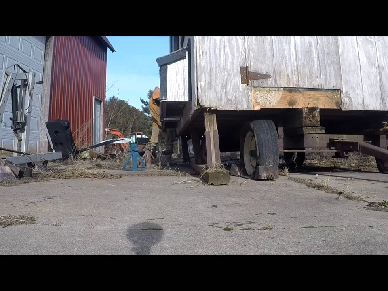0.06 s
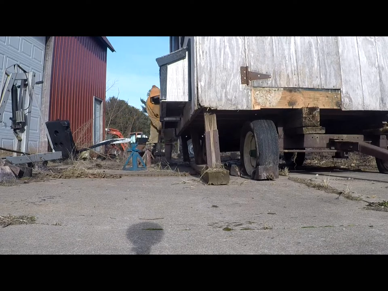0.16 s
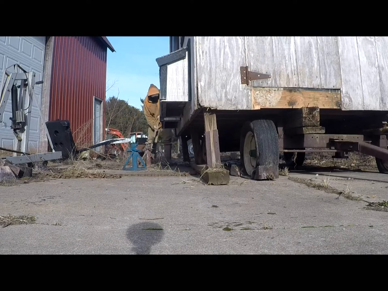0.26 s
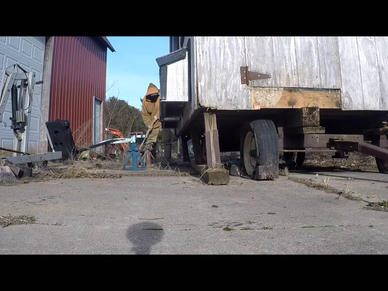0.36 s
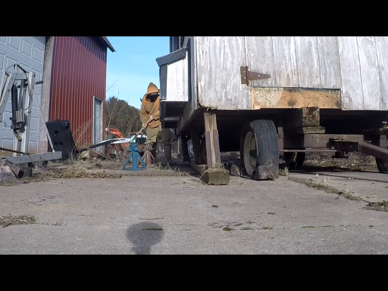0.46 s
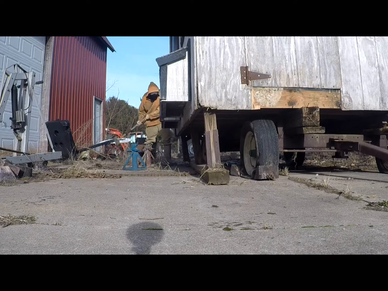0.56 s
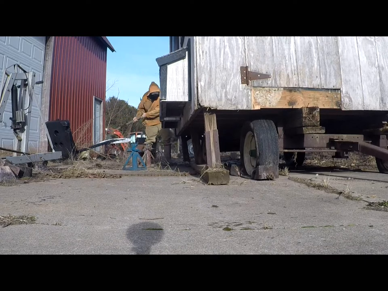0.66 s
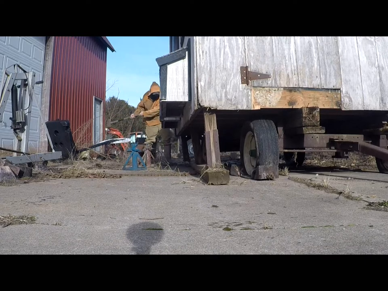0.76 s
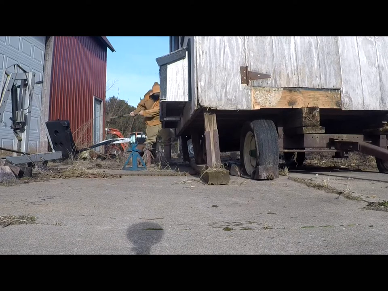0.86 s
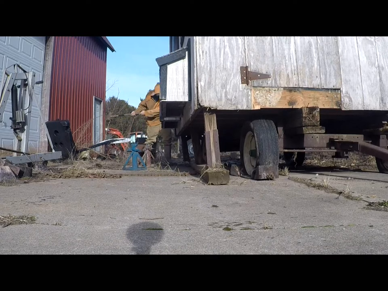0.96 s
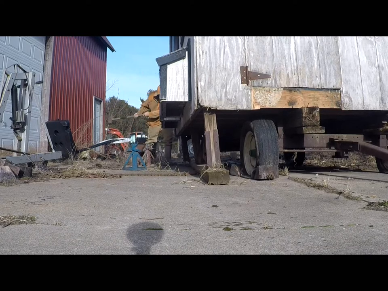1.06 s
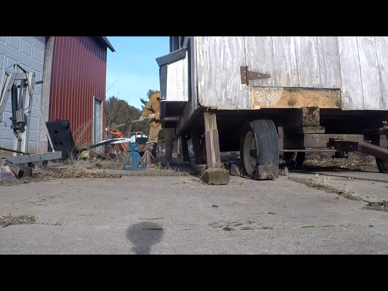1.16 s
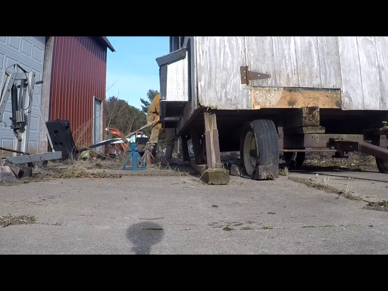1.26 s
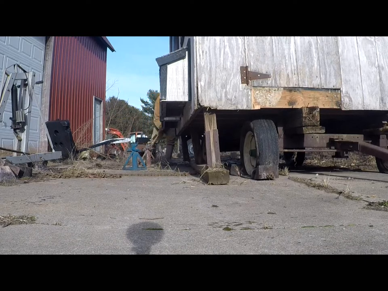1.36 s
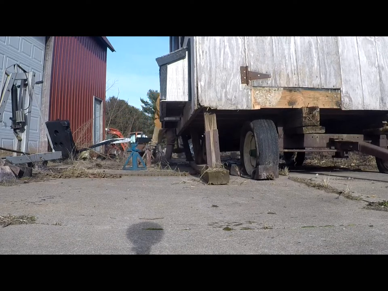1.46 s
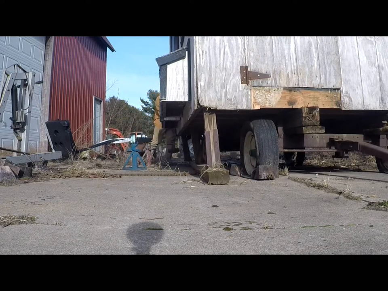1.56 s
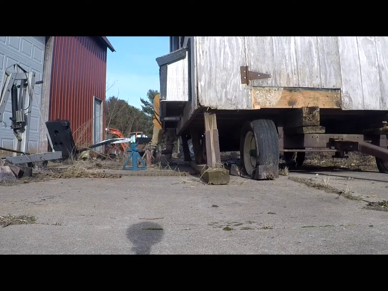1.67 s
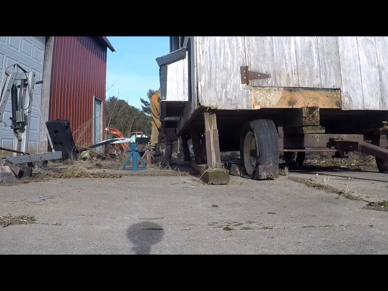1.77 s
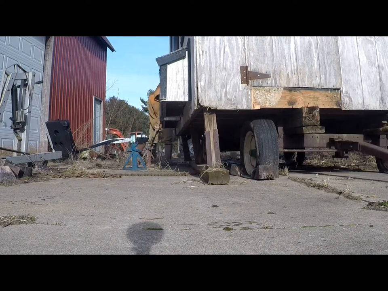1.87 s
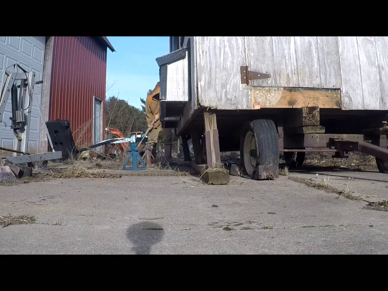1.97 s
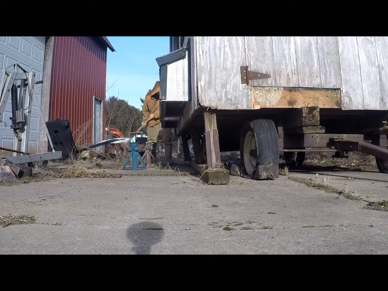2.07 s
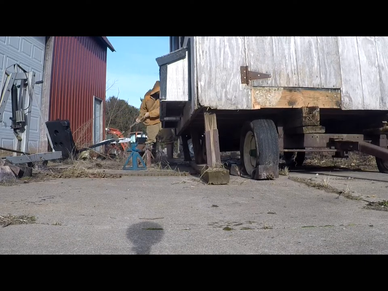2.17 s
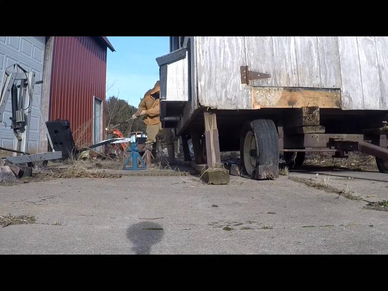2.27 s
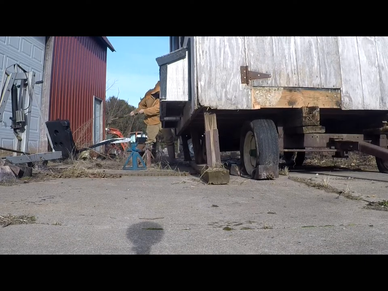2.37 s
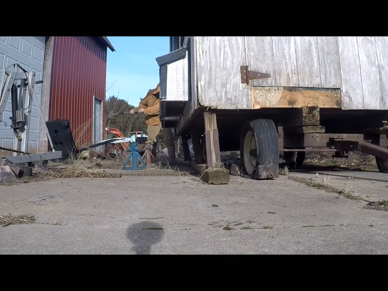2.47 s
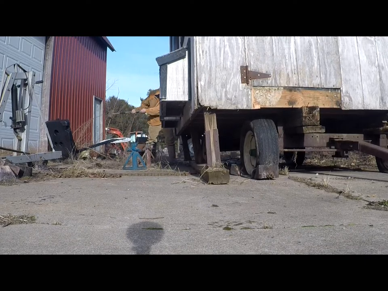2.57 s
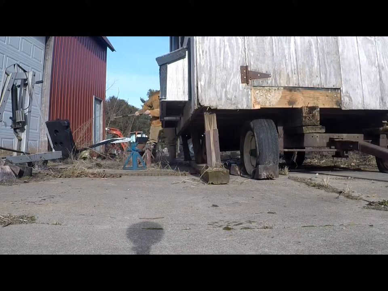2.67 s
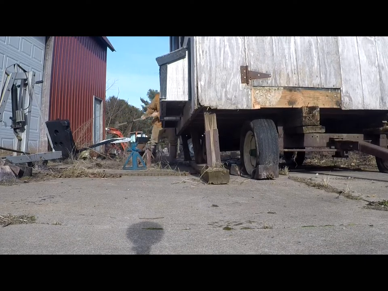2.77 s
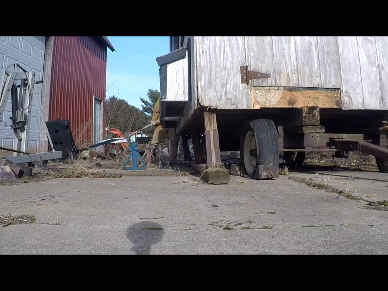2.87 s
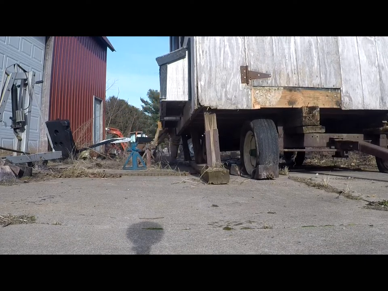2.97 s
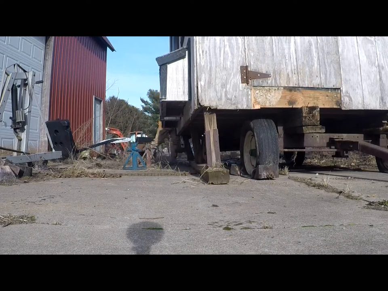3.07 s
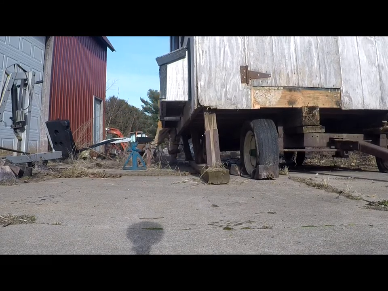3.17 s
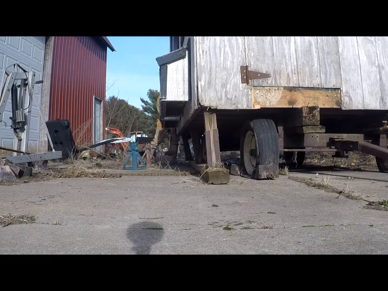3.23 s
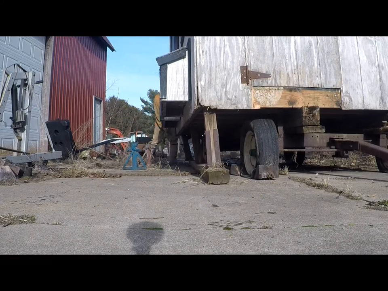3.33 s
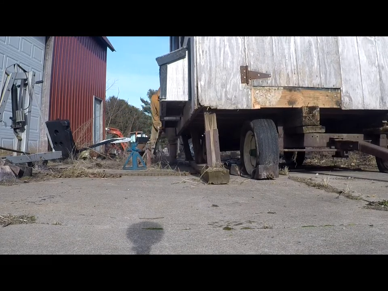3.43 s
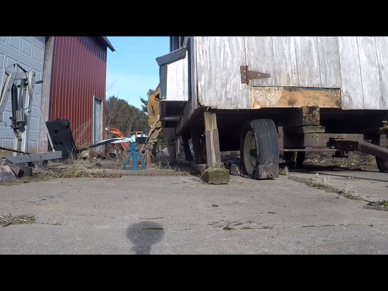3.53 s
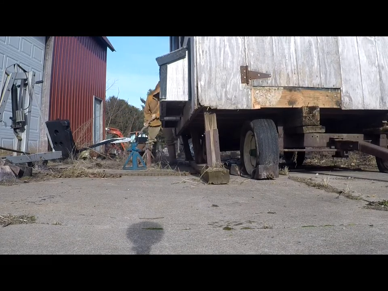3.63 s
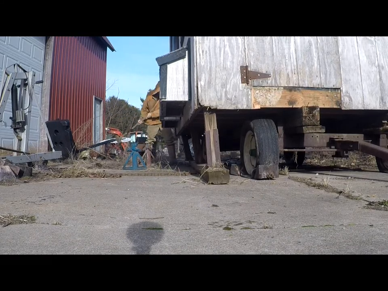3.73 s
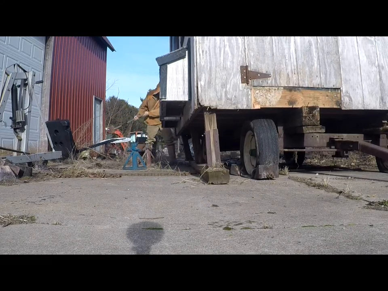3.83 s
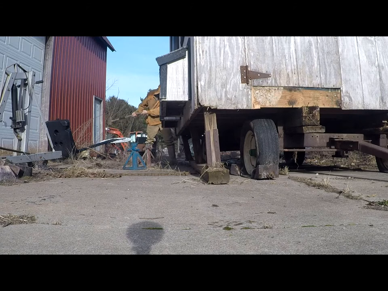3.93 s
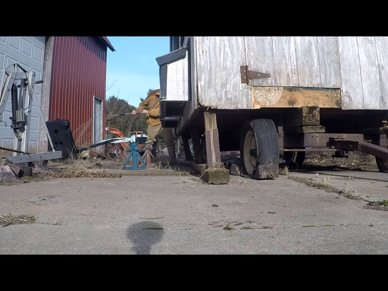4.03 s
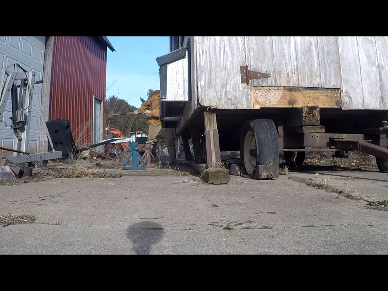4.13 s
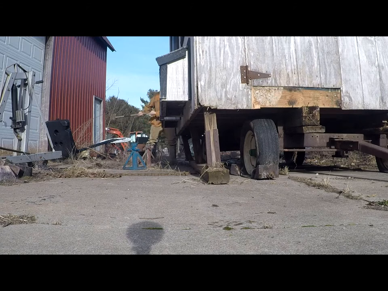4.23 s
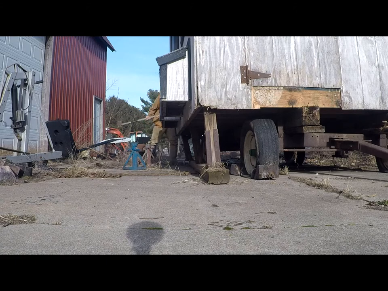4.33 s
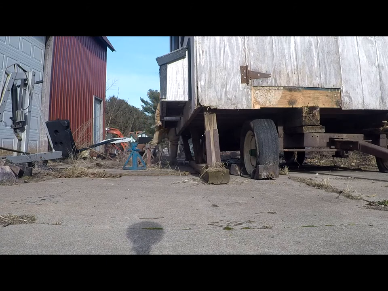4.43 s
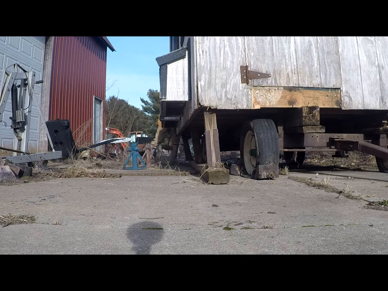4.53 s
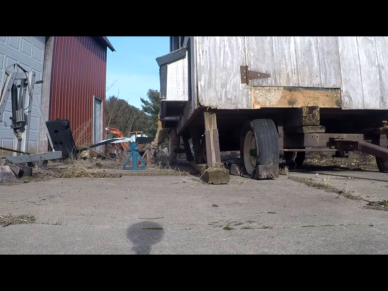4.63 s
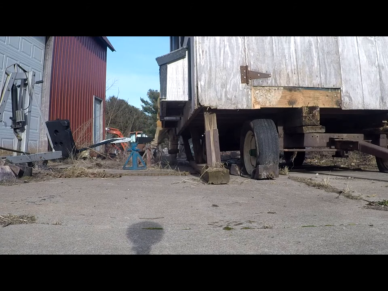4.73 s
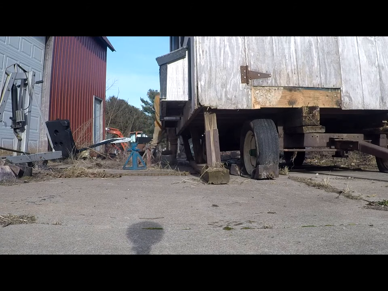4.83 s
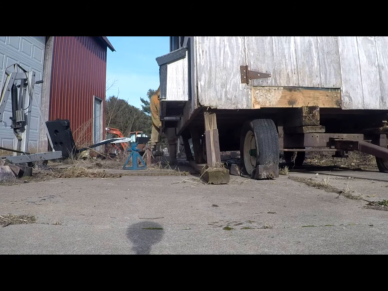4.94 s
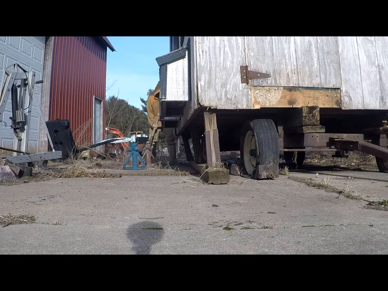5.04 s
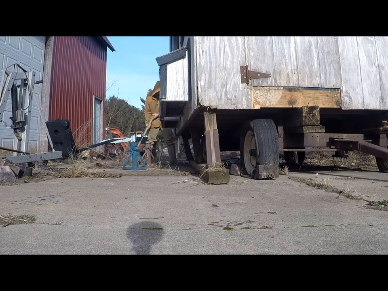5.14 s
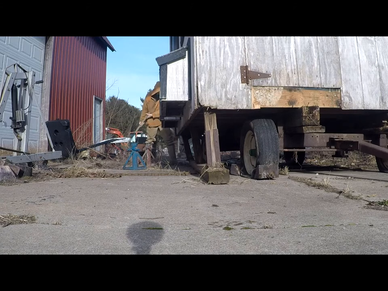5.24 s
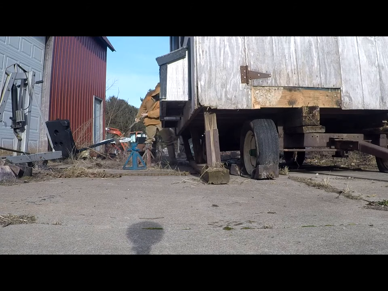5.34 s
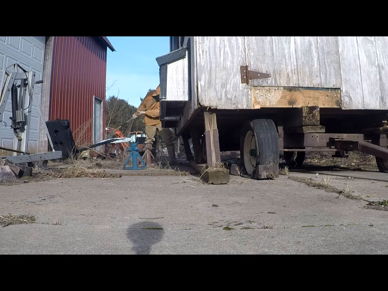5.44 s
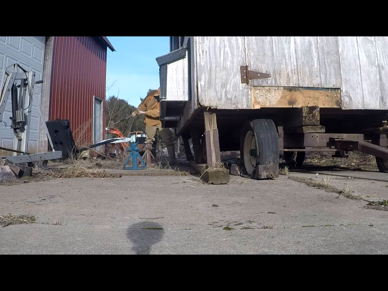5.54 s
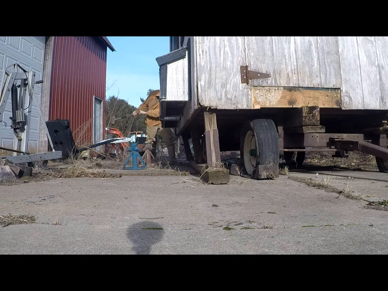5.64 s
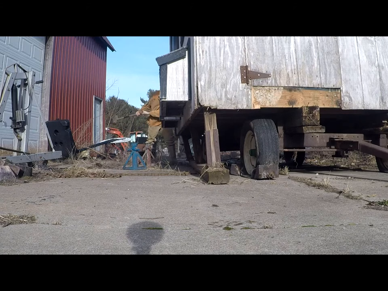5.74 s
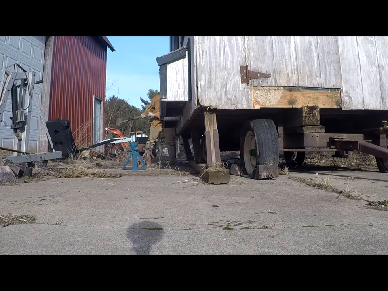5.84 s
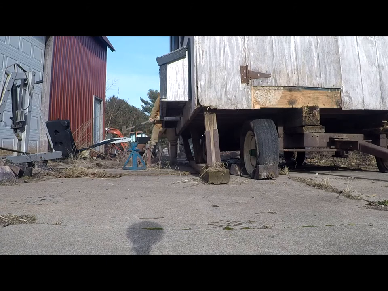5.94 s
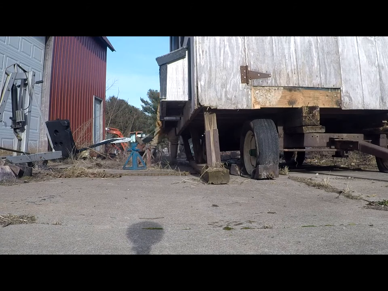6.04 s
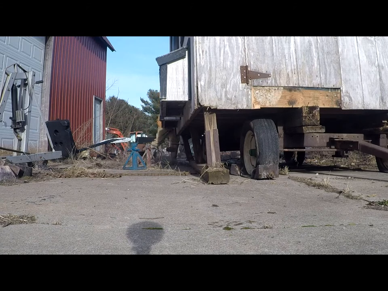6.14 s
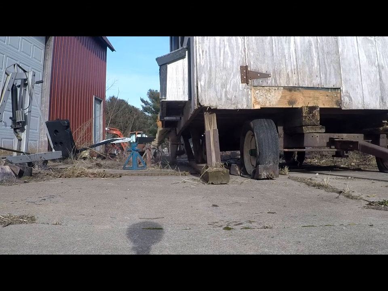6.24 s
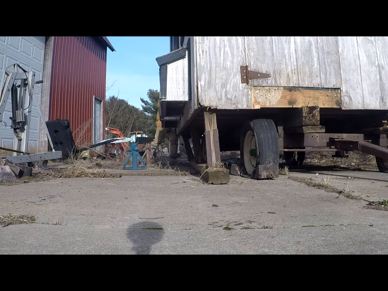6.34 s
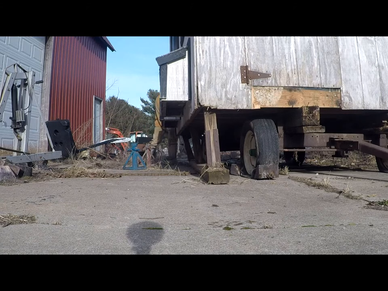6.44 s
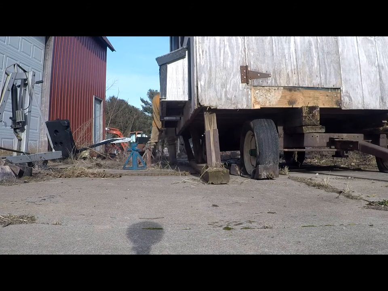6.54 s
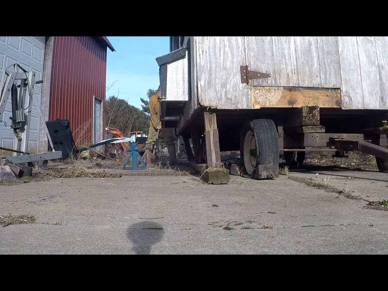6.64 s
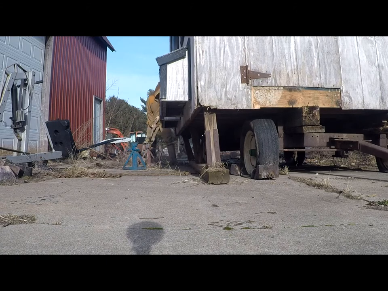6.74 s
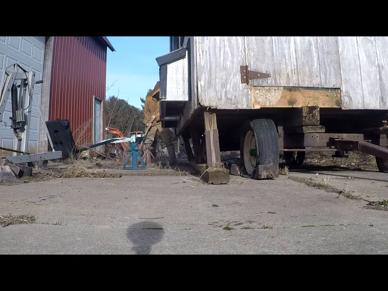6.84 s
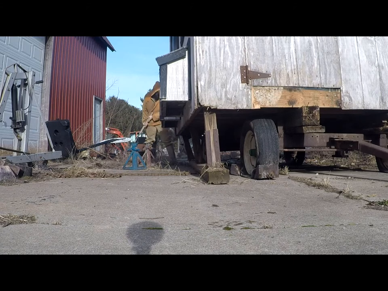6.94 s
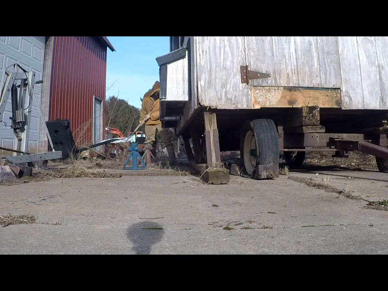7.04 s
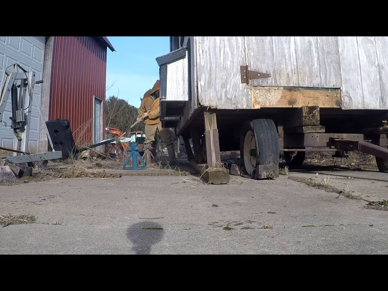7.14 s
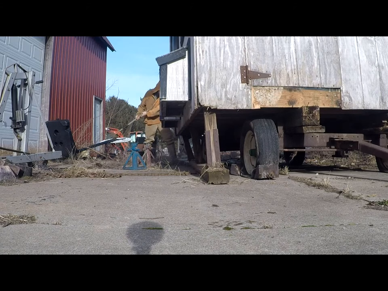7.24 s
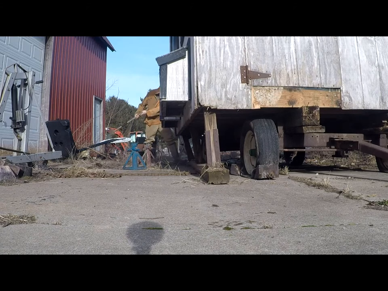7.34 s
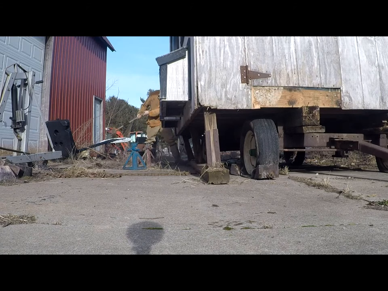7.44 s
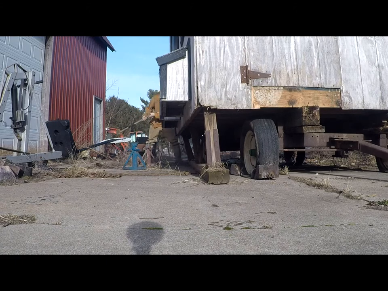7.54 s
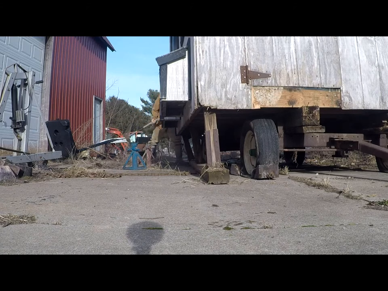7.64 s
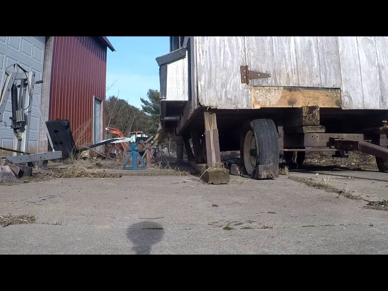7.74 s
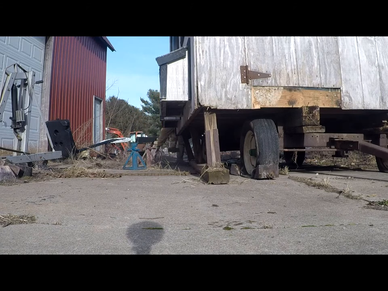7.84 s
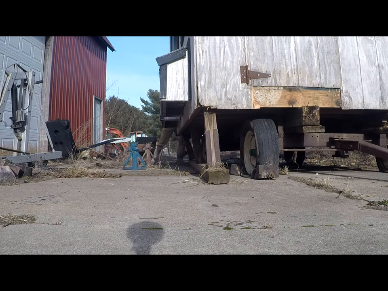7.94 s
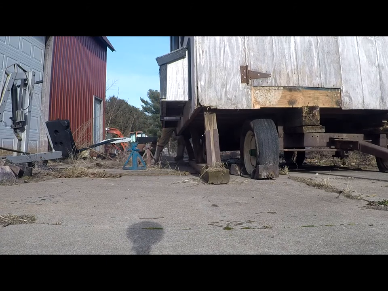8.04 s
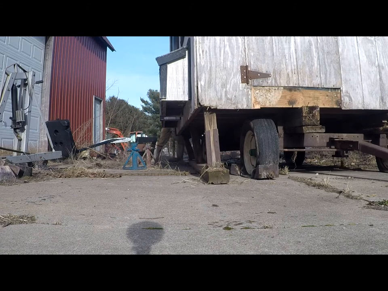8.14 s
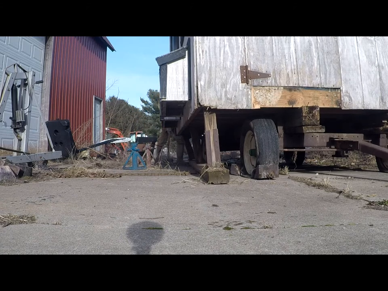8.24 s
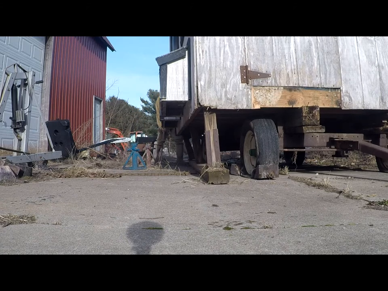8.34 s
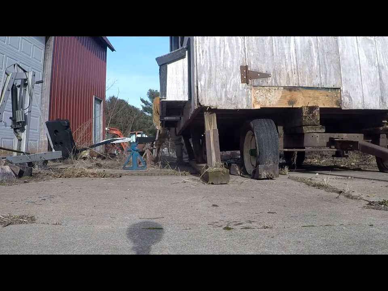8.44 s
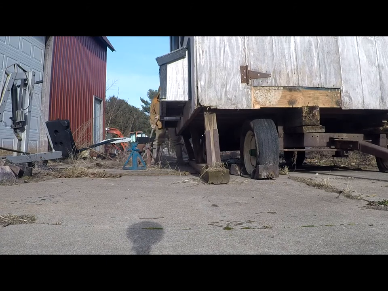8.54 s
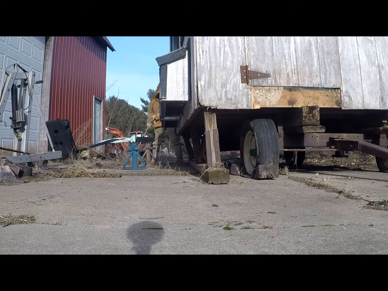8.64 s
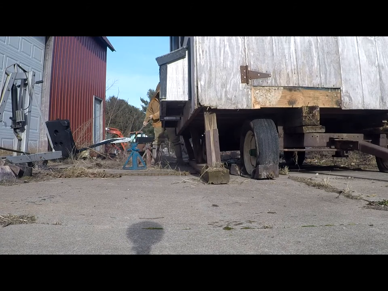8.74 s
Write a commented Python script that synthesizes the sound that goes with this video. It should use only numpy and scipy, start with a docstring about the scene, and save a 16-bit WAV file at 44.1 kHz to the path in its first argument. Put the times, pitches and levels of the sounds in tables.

```python
"""A long-handled steel jack lifts a wooden building in a concrete yard, one stroke about every 1.6 s.
Each stroke ends as the load drops onto the pin: noise bursts for the steel, decaying modes for the timber
frame, and an overloaded microphone. Between strokes the handle scuffs and ticks, and the pivot creaks.
A far vehicle passes and recedes as shaped noise and engine tones, over dry leaves, rumble and wind;
rush and leaves swell back after every clank as the gain control recovers."""
import sys
import numpy as np
from scipy import signal
from scipy.fft import rfft, irfft
from scipy.io import wavfile
from scipy.ndimage import uniform_filter1d, minimum_filter1d

SR = 44100
rng = np.random.default_rng(int(sys.argv[2]) if len(sys.argv) > 2 else 0)


def put_to_file(sound):
    """Save the sound as 16-bit audio at rate SR, in the file named by the first command-line argument."""
    columns = np.atleast_2d(sound).T  # one column per channel
    safe = np.clip(columns, -1, 1)
    whole_steps = np.round(safe * 32767)
    wavfile.write(sys.argv[1], SR, whole_steps.astype(np.int16))


N = 388080
TIME = np.arange(N) / SR   # seconds

# The load drops on the pin. Each row: time of landing in seconds, level in dB, crack in dB, rebound in dB
# relative to the crack, strongest boom in Hz, steel ring in dB.
CLANKS = [(-.035, -3, -1, 2, 198, -14), (1.5451, 0.5, 0, -15, 344, -2), (3.127, 0, 1.5, -10.5, 223.3, 1),
          (4.6519, 0.5, 0.5, -16, 268, -3), (6.2443, -0.5, 0, -20, 283, 2.5),
          (7.945, 0.5, -1, -9.5, 265, 1)]
# Modes of jack and timber frame. Each row: frequency in Hz, relative level in dB, t60 in seconds.
FRAME_MODES = [(64.5, -21, 0.33), (90.4, -24, 0.4), (139.6, -18.5, 0.35), (187, -16.5, 0.051),
               (218.8, -12, 0.28), (269.2, -10.5, 0.16), (289.3, -7.5, .21), (343.8, -14.5, .23),
               (466, -14.5, 0.21), (581, -16.5, 0.22), (688.5, -18, 0.16), (844, -22, 0.13),
               (958, -24, 0.26), (1020, -14, 0.16), (1130, -20, 0.19), (1235, -22, 0.2), (1505, -21, 0.08),
               (1505, -28, 0.15), (2094, -22.5, 0.17), (2250, -24, 0.074), (2866, -20, 0.078),
               (4007, -26, 0.12), (4850, -28, 0.14), (5250, -27.5, 0.12), (7500, -60, 1.3),
               (12000, -70.5, 0.88)]
# Colour of a sharp steel snap. Each row: frequency in Hz, relative level per Hz in dB.
SNAP_COLOUR = [(800, -6.5), (2500, -4.5), (5500, -4), (8500, 5.5), (10500, -11.5), (15000, -16)]
# Colour of the heavy steel contact. Each row: frequency in Hz, relative level per Hz in dB.
CRACK_COLOUR = [(100, -5.5), (300, -2), (700, 1.5), (1150, 1.5), (2000, -7), (4000, -12.5), (8500, -16.5),
                (10500, -25), (15000, -31)]
# Colour of the rattling planks. Each row: frequency in Hz, relative level per Hz in dB.
PLANKS_COLOUR = [(30, -6), (100, -8), (260, 1.5), (420, -10.5), (1000, -20), (2000, -23), (4000, -30.5),
                 (8000, -38), (11000, -50.5), (15000, -46.5)]
# Colour of the far echo of the yard. Each row: frequency in Hz, relative level per Hz in dB.
YARD_COLOUR = [(30, -7), (200, -5), (400, -4.5), (1000, -10.5), (3000, -30.5), (8000, -44), (15000, -50.5)]
# Loose steel parts ring after a drop. Each row: start in seconds, frequency in Hz, level in dB,
# t60 in seconds, chatter in dB.
PINGS = [(4.740, 4608, -11, .17, -18), (4.740, 8775, -15, .13, -17), (4.740, 12150, -18, .13, -21),
         (4.808, 2330, -31, .25, -28), (4.862, 2740, -33, .65, -27), (4.862, 4161, -30, .2, -34),
         (4.862, 5405, -24, .13, -34)]
# The clearest ticks of the handle and its pins. Each row: start in seconds, ring in dB, ring in Hz, snap in dB.
TICKS = [(0.721, -36, 3040, -34), (1.3535, -35, 2980, -22), (2.077, -39, 1600, -30),
         (2.218, -34, 3800, -27.5), (2.320, -32.5, 3000, -27), (4.1750, -33.5, 2590, -38),
         (4.4765, -33, 1800, -53), (4.807, -20, 2340, -16), (5.475, -38, 3050, -35),
         (6.703, -30, 1840, -42), (6.7455, -29, 1490, -41), (6.793, -31, 3110, -31),
         (6.9197, -33, 2280, -41), (8.2823, -38, 3560, -24), (8.426, -44, 3500, -27),
         (8.493, -39, 1760, -29.5), (8.587, -31.5, 3070, -38), (8.777, -36, 1940, -46)]
# The handle is swung back in a short run of scuffs. Each row: start in seconds, level in dB,
# time between scuffs in seconds, change from one scuff to the next in dB.
SWINGS = [(2.085, -26.5, .1, 0), (3.665, -26, 0.1, -1), (4.911, -18, 0.132, -6), (5.265, -23, 0.15, -4),
          (6.745, -20.5, 0.089, -3), (7.0, -27, 0.11, -6), (8.488, -23.5, .11, -1)]
# Colour of a scuff. Each row: frequency in Hz, relative level per Hz in dB.
SCUFF_COLOUR = [(100, -14), (200, -2), (330, -2), (430, 2), (520, -2), (680, -3), (950, -9), (2000, -20),
                (5000, -31), (15000, -45)]
# Steel creaks as the load peaks. Each row: middle in seconds, width in seconds, level in dB.
RUBS = [(2.99, 0.014, -35.5), (4.52, .031, -47), (5.8, 0.037, -45.5), (7.5, 0.013, -44), (7.77, 0.082, -43)]
# What the creaking sets ringing. Each row: frequency in Hz, relative level in dB, t60 in seconds.
PIVOT_MODES = [(1710, -1.5, 0.0066), (2000, -8, .015), (2820, -5.5, .012), (3180, -10, 0.027),
               (3454, -9.5, 0.012), (4400, -18, 0.0035), (8140, -15, .01)]
# The pivot squeaks. Each row: start in seconds, length in seconds, start in Hz, end in Hz, level in dB.
SQUEAKS = [(4.053, 0.13, 5020, 5030, -47), (4.2, 0.047, 4540, 4200, -43)]
# Colour of the far tyre rush. Each row: frequency in Hz, relative level per Hz in dB.
RUSH_COLOUR = [(88, -26), (150, -0.5), (178, -4.5), (289, -9.5), (378, -7), (601, -9), (701, -9.5),
               (1430, -12.5), (4120, -26.5), (15000, -48.5)]
# The far engine's orders swell in turn. Each row: multiple of the firing rate, loudest moment in seconds,
# width in seconds, level in dB.
ENGINE_ORDERS = [(1, 1.5, 0.51, -33), (2, 0.71, .7, -37.5), (3, 0.25, 0.2, -45), (4, 0.31, 0.39, -31)]
# Colour of the outdoor rumble. Each row: frequency in Hz, relative level per Hz in dB.
RUMBLE_COLOUR = [(20, 2), (55, 1.5), (100, 1.5), (180, -4.5), (300, -8), (700, -30.5)]
# Colour of the dry leaves. Each row: frequency in Hz, relative level per Hz in dB.
LEAVES_COLOUR = [(800, -5), (2500, -2), (8500, -8.5), (10500, -10.5), (15000, -11.5)]
# Dry leaves rustle. Each row: middle in seconds, width in seconds, level in dB.
RUSTLES = [(7.47, 0.096, -41.5), (7.76, 0.059, -44.5), (8.3, 0.14, -40)]
# Slow wind pressure on the microphone. Each row: time in seconds, level in dB.
BUFFET = [(0, -37.5), (3.9, -40), (4.2, -28), (7.6, -24.5), (8.8, -31.5)]

CLANK_DB, REBOUND_S = 24, 0.019   # level common to all clanks, delay of the rebound
# faint ticks come within this span after a drop, while the handle is slack
SLACK_FROM_S, SLACK_TO_S, FAINT_TICK_DB, FAINT_TICK_HZ = 0.98, 0.99, -45.5, 2600
SCUFF_RISE_S, SCUFF_T60_S = 0.025, 0.33
# closest approach of the vehicle, time it takes to travel its own distance, tyre rush at that point
PASS_S, PASS_WIDTH_S, PASS_DB = 1.25, 0.66, -32.5
ENGINE_HZ, ENGINE_SAG_HZ_PER_S = 47.2, 1.5   # firing rate at the start, sinking as it goes by
RUMBLE_DB, LEAVES_DB = -44, -49   # steady outdoor background
CUTOFF_HZ = 15450


def from_db(db):
    """Decibels to gain."""
    return 10 ** (np.asarray(db) / 20)


def rms_one(x):
    """Scale to unit rms."""
    return x / np.sqrt(np.mean(x ** 2) + 1e-20)


def noise(colour, size=N):
    """Noise of a given spectrum, falling away beyond its ends; rms 1."""
    hz, db = np.transpose(colour)
    f = np.fft.rfftfreq(size, 1 / SR) + 1e-3
    ends = 1 / (1 + (hz[0] / 2 / f) ** 2) / (1 + (f / hz[-1] / 2) ** 4)
    gain = from_db(np.interp(np.log(f), np.log(hz), db))
    return rms_one(irfft(rfft(rng.standard_normal(size)) * ends * gain, size))


def drift(rate):
    """Slow random wander of rms 1, mostly below a rate in Hz."""
    f = np.fft.rfftfreq(N, 1 / SR)
    return rms_one(irfft(rfft(rng.standard_normal(N)) / (1 + (f / rate) ** 4), N))


def fade(t, t60):
    """Free decay that begins at t = 0 and loses 60 dB in t60 seconds."""
    return (t >= 0) * np.exp(-np.log(1000) * np.maximum(t, 0) / t60)


def tone(hz, t):
    """Steady sine."""
    return np.sin(2 * np.pi * hz * t)


def add(out, s, sound):
    """Mix a sound in at time s."""
    at = round(s * SR)
    part = sound[max(-at, 0):max(N - at, 0)]
    out[max(at, 0):max(at, 0) + len(part)] += part


def swells(rows):
    """Sum of bell-shaped levels, each given as (middle, width, dB)."""
    return sum(from_db(db) * np.exp(-0.5 * ((TIME - s) / width) ** 2) for s, width, db in rows)


def clanks(click_db=2, click_t60=0.0061, crack_db=-3, crack_t60=0.08,
           planks_db=-7, planks_t60=0.28, frame_db=-2.5, build_s=0.00053,
           yard_db=-52, yard_t60=1.9, slip_s=0.008, slip_hz=230, slip_db=-7, slip_grit_db=-22):
    """The pin slips, then lands: a steel crack with one rebound, ringing frame and planks, and the yard's echo."""
    out = np.zeros(N)
    t = np.arange(SR) / SR - slip_s   # the pin lands at t = 0
    # half the power of steel and planks is the same at every stroke
    contact = noise(CRACK_COLOUR, size=SR)
    boards = noise(PLANKS_COLOUR, size=SR)
    build = 1 - np.exp(-np.maximum(t, 0) / build_s)   # the heavy timber takes a moment to move
    slipping = (t < 0) * (1 + t / slip_s)
    for s, db, hard_db, rebound_db, boom_hz, ring_db in CLANKS:
        steel = (contact + noise(CRACK_COLOUR, size=SR)) / np.sqrt(2)
        wood = (boards + noise(PLANKS_COLOUR, size=SR)) / np.sqrt(2)
        # first touch of the faces
        click = from_db(click_db) * noise(SNAP_COLOUR, size=SR) * fade(t, click_t60)
        rebound = from_db(rebound_db) * fade(t - REBOUND_S, crack_t60 / 2)
        crack = from_db(crack_db) * steel * (fade(t, crack_t60) + rebound)
        frame = from_db(frame_db) * frame_ring(t, boom_hz, ring_db)
        planks = from_db(planks_db) * wood * fade(t, planks_t60)
        yard = from_db(yard_db) * noise(YARD_COLOUR, size=SR) * fade(t, yard_t60)
        groan = from_db(slip_db) * np.cos(2 * np.pi * slip_hz * t)
        slip = slipping * (groan + from_db(slip_grit_db) * steel)
        timber = build * (frame + planks + yard)
        impact = from_db(hard_db) * (click + crack)
        add(out, s - slip_s, from_db(CLANK_DB + db) * (slip + impact + timber))
    return out


def frame_ring(t, boom_hz, ring_db, boom_db=4, boom_width=0.12, spread_db=2, steel_hz=420):
    """As the weight shifts, each stroke favours other timber modes; the higher modes are the steel's."""
    hz, db, t60 = np.transpose(FRAME_MODES)
    boom = boom_db * np.exp(-0.5 * (np.log(hz / boom_hz) / boom_width) ** 2)
    steel = ring_db * (hz > steel_hz)
    gains = from_db(db + boom + steel + spread_db * rng.standard_normal(len(hz)))
    return sum(gain * fade(t, decay) * np.sin(2 * np.pi * (f * t + rng.random()))
               for f, gain, decay in zip(hz, gains, t60))


def pings(chatter_t60=0.13):
    """Loose parts chatter briefly as narrow noise and ring in thin decaying tones."""
    out, t = np.zeros(N), TIME[:SR]
    for s, hz, db, t60, chatter_db in PINGS:
        ring = tone(hz, t) * fade(t, t60)
        chatter = noise([(hz / 2, -40), (hz, 0), (hz * 2, -40)], size=len(t)) * fade(t, chatter_t60)
        add(out, s, from_db(db) * ring + from_db(chatter_db) * chatter)
    return out


def faint_ticks(spread_db=3, spread_octaves=0.65, count=3):
    """Rows for a few close ticks of random pitch and level, about a second after each drop but the first."""
    rows = []
    for drop in CLANKS[1:]:
        for _ in range(count):
            s = drop[0] + rng.uniform(SLACK_FROM_S, SLACK_TO_S)
            ring_db = FAINT_TICK_DB + spread_db * rng.normal()
            hz = FAINT_TICK_HZ * 2 ** (spread_octaves * rng.normal())
            snap_db = FAINT_TICK_DB + spread_db * rng.normal()
            rows.append((s, ring_db, hz, snap_db))
    return rows


def ticks(snap_t60=0.016, body_t60=0.055):
    """Light steel contacts: a bright snap and a short resonance, both decaying noise."""
    out, t = np.zeros(N), TIME[:SR // 4]
    for s, ring_db, hz, snap_db in TICKS + faint_ticks():
        snap = noise(SNAP_COLOUR, size=len(t)) * fade(t, snap_t60)
        resonance = [(hz / 2, -22), (hz, 0), (hz * 2, -24), (hz * 4, -40)]
        body = noise(resonance, size=len(t)) * fade(t, body_t60)
        add(out, s, from_db(snap_db) * snap + from_db(ring_db) * body)
    return out


def scuffs(grain_db=1.5, count=3):
    """Each swing is a run of scuffs; each rises quickly and dies away in the hollow under the floor."""
    power, t = np.zeros(N), TIME[:SR]
    shape = (1 - np.exp(-t / SCUFF_RISE_S)) * fade(t, SCUFF_T60_S)
    for s, db, gap_s, step_db in SWINGS:
        for k in range(count):
            add(power, s + k * gap_s, (from_db(db + k * step_db) * shape) ** 2)
    return np.sqrt(power) * noise(SCUFF_COLOUR) * from_db(grain_db * drift(38))


def creaks(slips_per_s=700, slip_spread_db=3):
    """Loaded steel sticks and slips; every slip rings the pivot."""
    slips = (rng.random(N) < slips_per_s / SR) * from_db(slip_spread_db * rng.standard_normal(N))
    t = TIME[:SR // 20]
    # neighbouring modes ring in opposite sign
    ringing = sum(from_db(db) * fade(t, t60) * tone(hz, t) * (-1) ** k
                  for k, (hz, db, t60) in enumerate(PIVOT_MODES))
    return swells(RUBS) * rms_one(signal.fftconvolve(slips, ringing)[:N])


def squeaks(waver=0.0064):
    """The dry pivot sings in short glides of unsteady pitch."""
    out, wobble = np.zeros(N), 1 + waver * drift(210)
    for s, length, start_hz, end_hz, db in SQUEAKS:
        n = int(length * SR)
        phase = np.cumsum(np.linspace(start_hz, end_hz, n) * wobble[:n]) / SR
        add(out, s, from_db(db) * np.hanning(n) * np.sin(2 * np.pi * phase))
    return out


def tyres(gust_db=0.7, falloff=0.76):
    """The rush of the passing vehicle falls with its distance from the microphone."""
    distance = np.hypot(1, (TIME - PASS_S) / PASS_WIDTH_S)   # 1 at closest approach
    level = from_db(PASS_DB + gust_db * drift(9.6)) / distance ** falloff
    return level * noise(RUSH_COLOUR)


def engine(waver=0.0083):
    """Only the lowest orders of the far engine carry this far; their pitch wavers a little."""
    hz = (ENGINE_HZ - ENGINE_SAG_HZ_PER_S * TIME) * (1 + waver * drift(6))
    phase = 2 * np.pi * np.cumsum(hz) / SR
    return sum(swells([(s, width, db)]) * np.sin(k * phase) for k, s, width, db in ENGINE_ORDERS)


def outdoors(rumble_gust_db=1.0, leaf_grain_db=1.5, buffet_hz=5):
    """Low rumble, hissing dry leaves, and wind pressing slowly on the microphone."""
    rumble = from_db(RUMBLE_DB + rumble_gust_db * drift(11)) * noise(RUMBLE_COLOUR)
    leaf_level = np.hypot(from_db(LEAVES_DB), swells(RUSTLES))
    leaves = leaf_level * from_db(leaf_grain_db * drift(120)) * noise(LEAVES_COLOUR)
    wind = from_db(np.interp(TIME, *np.transpose(BUFFET))) * drift(buffet_hz)
    return rumble + leaves + wind


def scene():
    """Everything heard at one microphone on the ground, the jack first and the open air last."""
    jack = clanks() + pings() + ticks() + scuffs() + creaks() + squeaks()
    background = tyres() + engine() + outdoors()
    return (jack + background)[None]


def ducking(over_db, hold_s, release_s, ahead_s=0.011, attack_s=0.008):
    """A gain that ducks just ahead of an excess level, holds, then creeps back."""
    hold = int(hold_s * SR)
    # running maximum over the last hold_s
    held = -minimum_filter1d(-over_db, hold, origin=(hold - 1) // 2, mode="nearest")
    # the cut in dB shrinks exponentially until a larger one takes over
    cut_db = np.exp(np.maximum.accumulate(np.log(held) + TIME / release_s) - TIME / release_s)
    early = np.interp(TIME + ahead_s, TIME, cut_db)
    return from_db(-uniform_filter1d(early, int(attack_s * SR)))


def gain_control(x, threshold_db=-11, depth_db=22, split_hz=210):
    """Loud sounds duck both bands; the bass comes back much sooner than the rest."""
    heard = signal.sosfilt(signal.butter(2, 100, "high", fs=SR, output="sos"), x)
    over = np.clip(20 * np.log10(np.abs(heard) + 1e-9) - threshold_db, 1e-6, depth_db)
    bass = signal.sosfiltfilt(signal.butter(2, split_hz, fs=SR, output="sos"), x)
    bass_gain = ducking(over, hold_s=0.064, release_s=0.15)
    rest_gain = ducking(over, hold_s=0.33, release_s=0.52)
    return bass * bass_gain + (x - bass) * rest_gain


def record(dry, top=0.93):
    """Gain control, overload that bends peaks towards a ceiling, and a steep top cut."""
    x = gain_control(dry[0]) / top
    clipped = top * x / (1 + x ** 6) ** (1 / 6)
    return signal.sosfilt(signal.ellip(10, 0.1, 80, CUTOFF_HZ, fs=SR, output="sos"), clipped)[None]


dry = scene()
out = record(dry)
put_to_file(out)
```